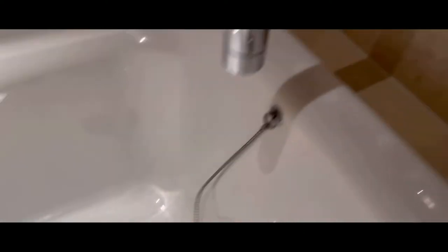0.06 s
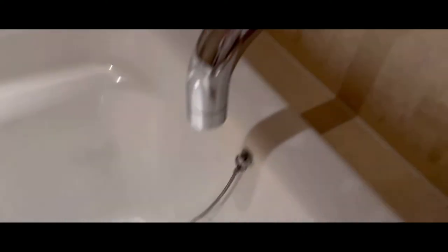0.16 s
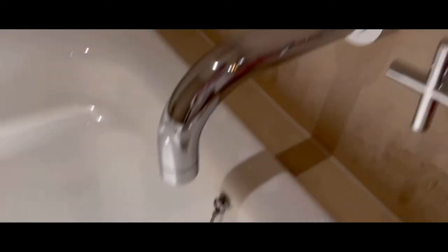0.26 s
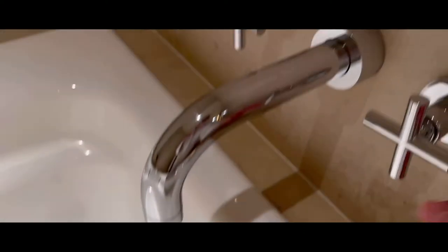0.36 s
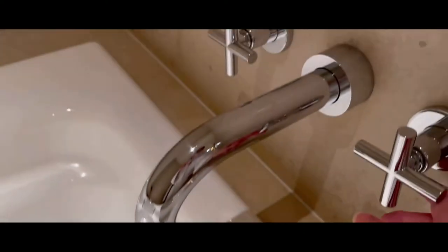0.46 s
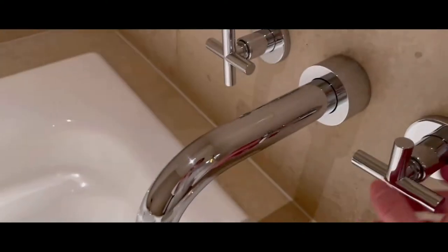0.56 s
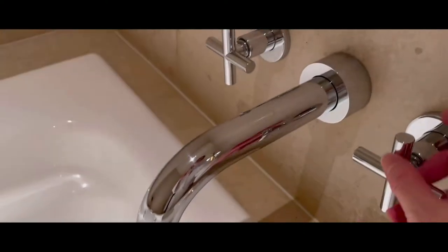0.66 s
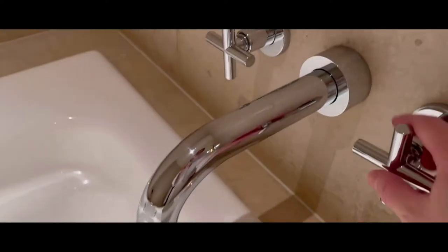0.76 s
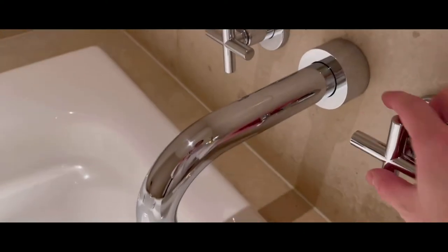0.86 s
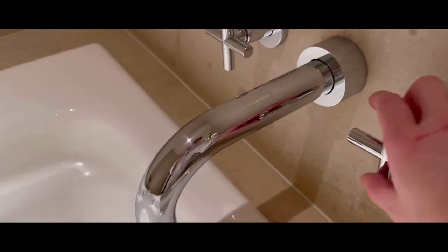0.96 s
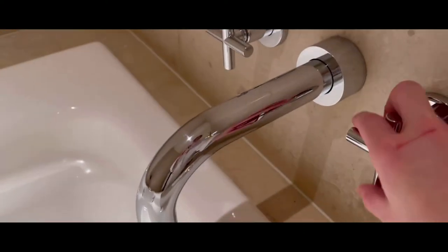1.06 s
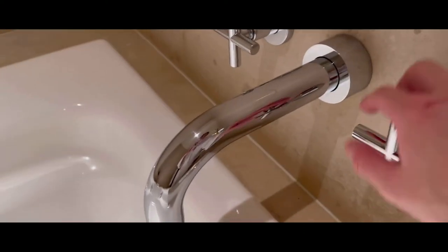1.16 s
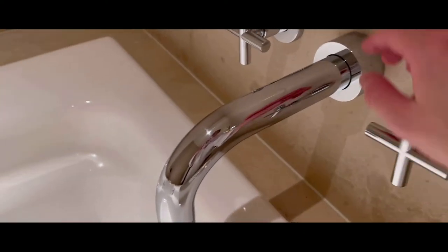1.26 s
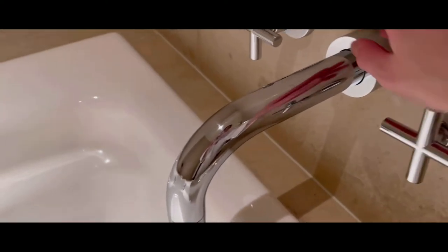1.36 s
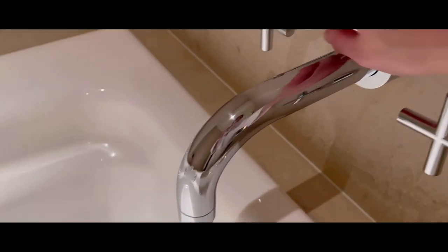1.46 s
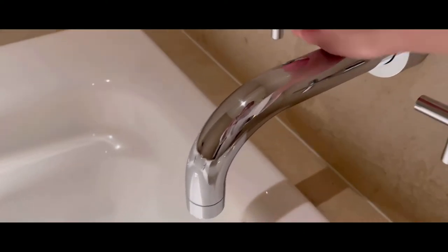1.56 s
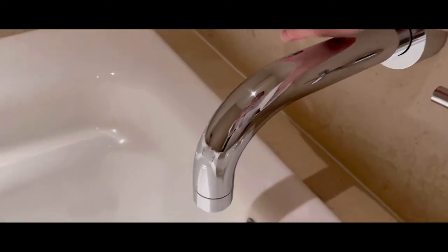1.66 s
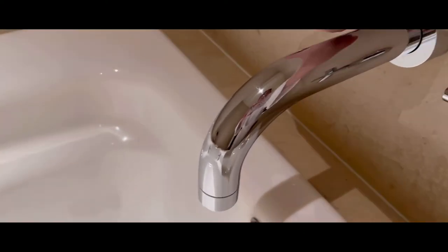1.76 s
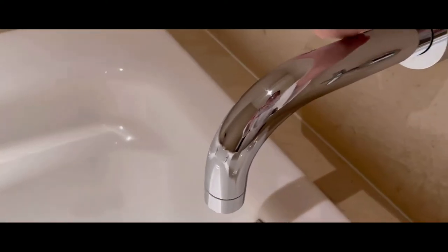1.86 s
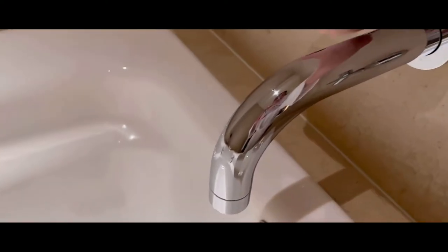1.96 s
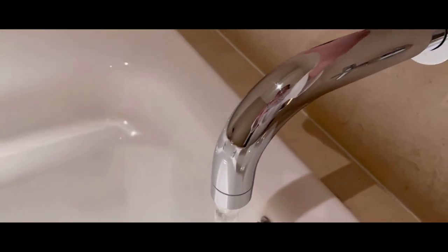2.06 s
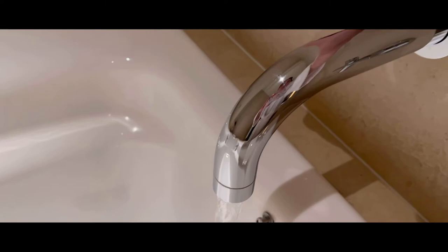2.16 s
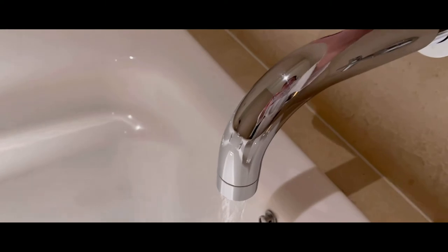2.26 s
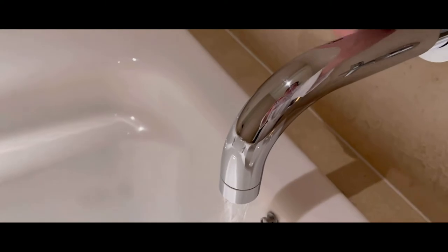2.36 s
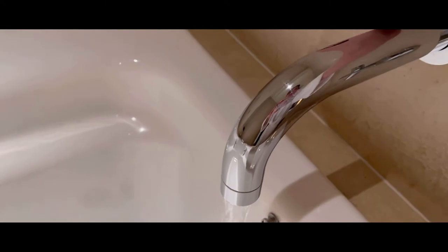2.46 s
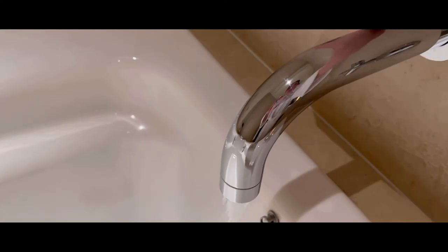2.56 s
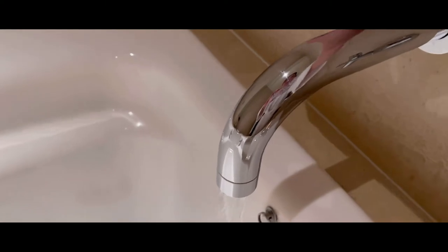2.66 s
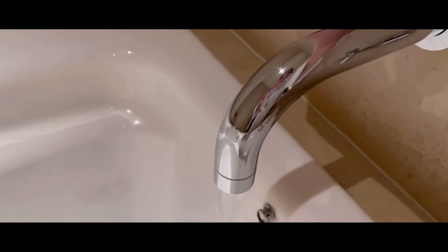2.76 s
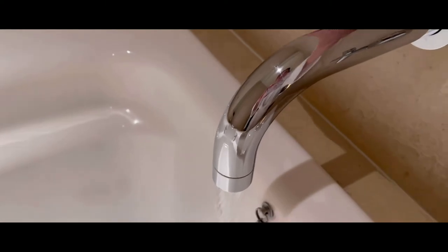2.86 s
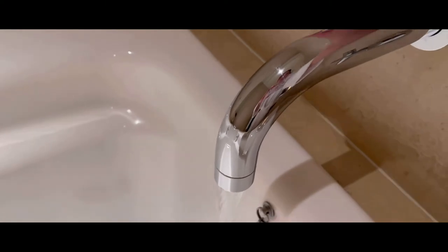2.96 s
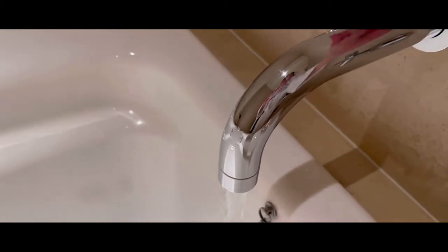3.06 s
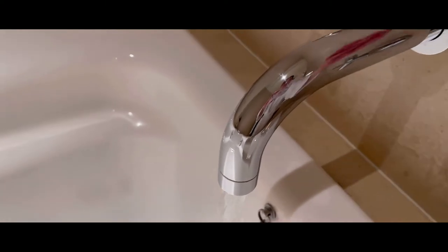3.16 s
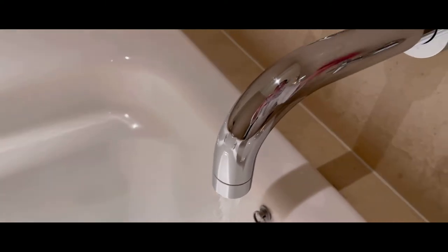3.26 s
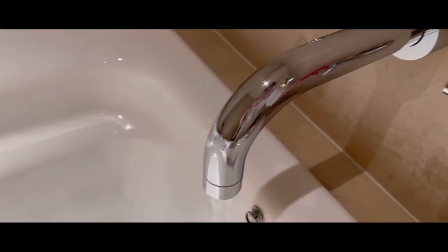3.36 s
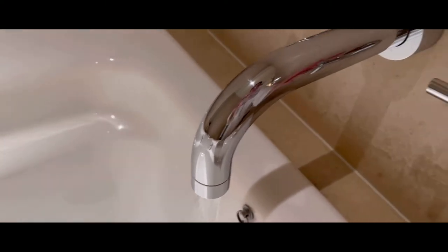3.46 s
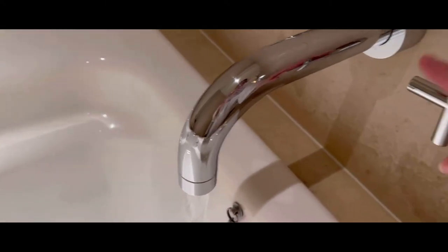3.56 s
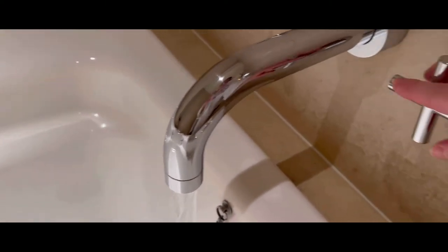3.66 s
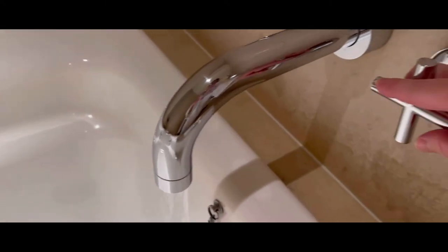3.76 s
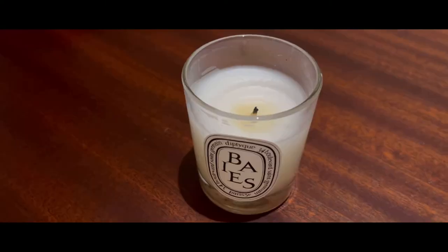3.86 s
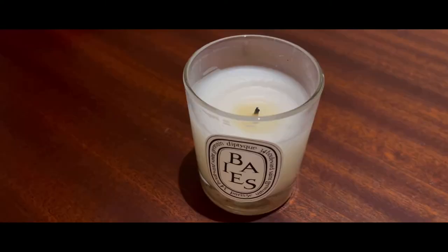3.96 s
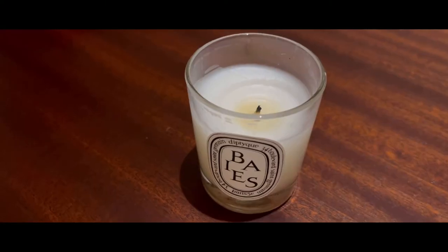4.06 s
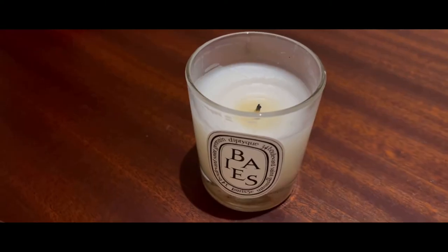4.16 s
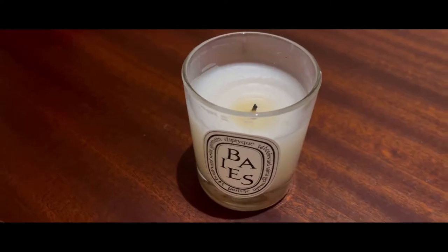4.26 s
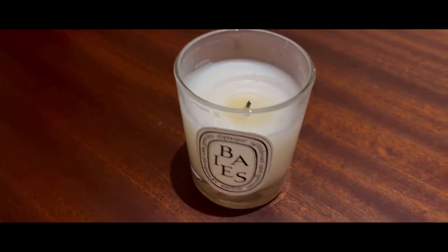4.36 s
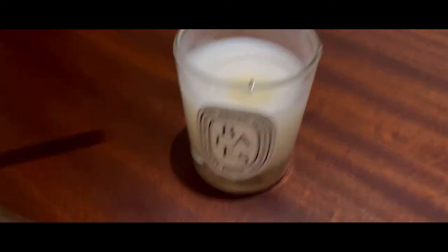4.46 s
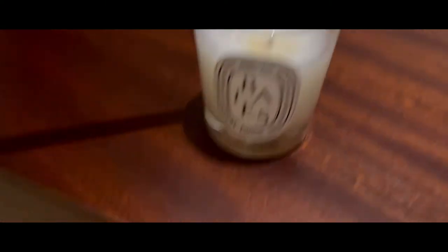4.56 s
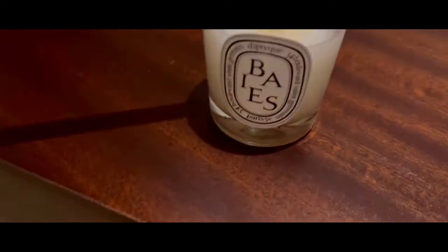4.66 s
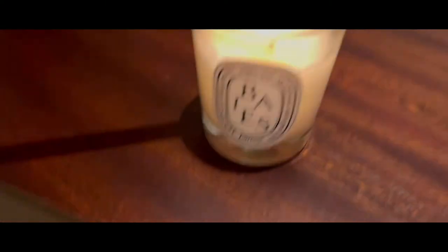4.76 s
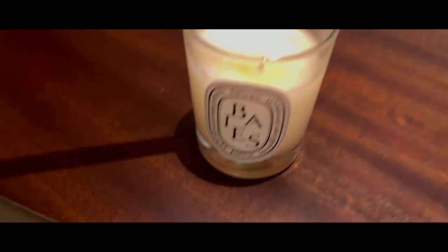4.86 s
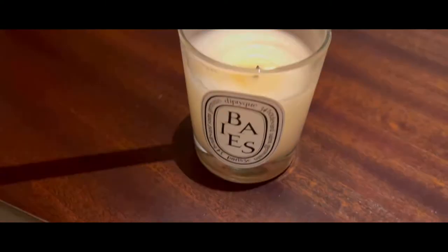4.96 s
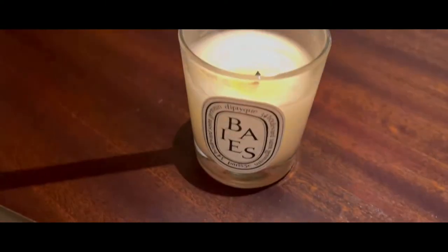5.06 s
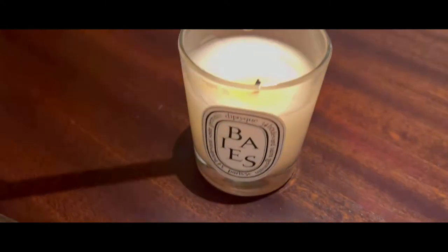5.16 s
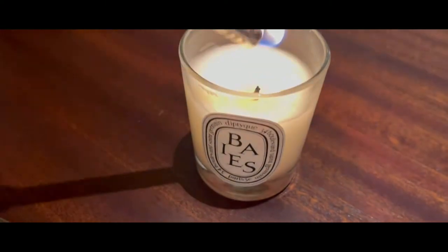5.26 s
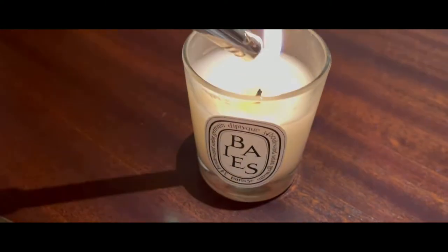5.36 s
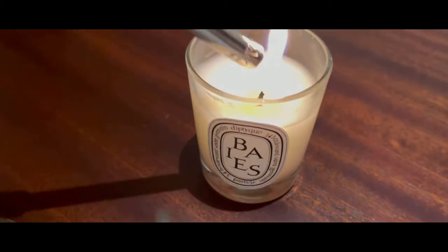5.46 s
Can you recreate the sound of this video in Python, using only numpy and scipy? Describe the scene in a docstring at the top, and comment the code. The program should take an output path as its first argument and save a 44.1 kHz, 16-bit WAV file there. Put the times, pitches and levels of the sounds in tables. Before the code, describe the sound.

A splash rings in a bathtub, a tap hisses and knocks, water drums and gurgles in, then cuts to a sharp click and wooden bump.

```python
"""A tiled bathroom: a tap is opened over an empty tub. A few splashes (shaped drop noise over tub modes),
valve hiss (coloured noise), pipe knocks (low noise and sines), then the stream: drumming resonances that
settle into a bright, gurgling splatter of ringing bubbles and drops; then a cut to a quieter scene with one
sharp click as of a switch (noise bursts, ringing modes, grainy tail) and a soft bump on wood (falling sines)."""
import sys
import numpy as np
from scipy import signal
from scipy.fft import rfft, irfft, next_fast_len
from scipy.io import wavfile

SR = 44100
rng = np.random.default_rng(int(sys.argv[2]) if len(sys.argv) > 2 else 0)


def dump(signal):
    """Clip the signal to [-1, 1] and save it as 16-bit WAV at the path in sys.argv[1]."""
    limited = np.clip(np.atleast_2d(signal).T, -1, 1)
    pcm = np.round(limited * 32767).astype(np.int16)
    wavfile.write(sys.argv[1], SR, pcm)


N = 242550
T = np.arange(N) / SR

# House rumble and air spectra. Each row: frequency in Hz, level in dB.
RUMBLE_COLOUR = [(12, -37), (20, -9), (76, 1), (125, -8.5), (161, -7.5), (189, -23.5), (236, -11.5),
                 (343, -24.5), (410, -20.5), (700, -33.5), (910, -56.5), (1540, -120)]
AIR_COLOUR = [(290, -30.5), (500, -5.5), (2530, -11), (5090, -15), (6030, -10), (10100, -20.5),
              (11800, -19), (15000, -35.5)]
AIR_DB = -80.5
TUB_RUMBLE_DB, QUIET_RUMBLE_DB = -57.5, -64.5  # before and after the cut
RUMBLE_WAVER_DB, RUMBLE_WAVER_HZ = 1.0, 5.7
# Soft low rustles of handling. Each row: start in seconds, length in seconds, level in dB.
HANDLING = [(0.4, 0.5, -56), (3.986, .17, -58), (4.256, 0.27, -62)]
# Rustle spectrum. Each row: frequency in Hz, level in dB.
HANDLING_COLOUR = [(110, 2.5), (170, 4.5), (350, -9.5), (700, -24.5)]

# Soft bumps on wood. Each row: start in seconds, thud level in dB, thud t60 in seconds, tap level in dB.
BUMPS = [(4.476, -70, .02, -54), (4.504, -52, 0.03, -47), (4.565, -23, 0.05, -45), (4.575, -37, 0.022, -52)]

# Clicks of the switch: lever press, contacts, an echo and later faint ticks.
# Each row: start in seconds, level in dB, t60 in seconds.
CLICKS = [(3.957, -50, 0.021), (3.976, -42, 0.037), (3.9869, -5, 0.0074), (3.9885, -9.5, 0.0082),
          (3.9921, -20.5, 0.011), (4.018, -26, 0.02), (4.183, -50, .025), (4.449, -56, 0.035)]
# Click and room tail spectra. Each row: frequency in Hz, level in dB.
CLICK_COLOUR = [(180, -43), (300, -23), (842, -34.5), (2170, -6), (2570, -6.5), (2880, -4.5), (5520, -9.5),
                (6100, -16), (6620, -15), (11100, -2.5), (16000, -32.5)]
TAIL_COLOUR = [(410, -64), (700, -32), (1700, -15.5), (3070, -6), (5800, -5), (7100, -9.5), (8920, -9),
               (10100, -8.5), (11000, 0), (12500, -23.5), (14000, -91)]
# Modes of the pressed lever, re LEVER_DB, and of the switch plate.
# Each row: frequency in Hz, level in dB, t60 in seconds.
LEVER_MODES = [(1860, -11.5, 0.032), (2570, 9, 0.044), (2920, -7, .03), (3424, 7.5, 0.049),
               (4065, -12.5, .025), (4650, -7.5, 0.03), (7660, -13, .025), (10540, -10, .012)]
PLATE_MODES = [(3020, -43.5, 0.4), (3190, -45.5, 0.68), (3130, -42.5, 0.67), (4590, -48.5, .42),
               (5400, -48.5, .4), (6350, -48.5, 0.53), (6550, -48.5, 0.69), (7760, -48, 0.6),
               (9800, -39, .3)]
LEVER_S, LEVER_DB, SNAP_RISE_S, TAIL_DB = 3.957, -52, 0.0005, -32.5

# Fingers shifting on the handle. Each row: start in seconds, level in dB, t60 in seconds.
GRIPS = [(1.018, -60, 0.15), (1.074, -63, 0.27), (1.184, -63, .05)]
# Handle resonances. Each row: frequency in Hz, width in Hz, level in dB.
HANDLE_MODES = [(470, 98, -9), (935, 110, -5), (1290, 83, -4), (2300, 720, 6)]

# Dull knocks of pipe and tub. Each row: start in seconds, level in dB, t60 in seconds, top edge in Hz.
KNOCKS = [(1.08, -53, 0.17, 1500), (1.477, -44.5, 1, 730), (1.58, -46, 1, 292), (1.908, -34.5, .5, 1390),
          (2.221, -38.5, 0.35, 503)]
# Knock spectrum. Each row: frequency in Hz, level in dB.
KNOCK_COLOUR = [(24, -37), (40, 1.5), (141, -6.5), (251, -16), (383, -6), (460, -14), (586, -13),
                (843, -25.5), (1040, -22), (1180, -11), (1500, -41), (1950, -63), (3300, -120)]
# Shell modes that boom under heavy slugs of water.
# Each row: start in seconds, frequency in Hz, level in dB, t60 in seconds.
BOOM = [(1.478, 245, -48, 1), (1.48, 405, -49, .7), (1.906, 369, -35, 0.21), (1.915, 137.8, -27.5, 0.43),
        (1.96, 171.4, -32, .22), (2.003, 106.2, -18, 0.45), (2.224, 255.9, -37, .17), (3.045, 406, -35, .3)]

# Lone splashes in the tub.
# Each row: start in seconds, level in dB, rise in seconds, t60 in seconds, wall ring level in dB.
SPLASHES = [(0.0, -36.5, 0.0001, 0.36, -48), (0.161, -45, .001, 0.033, -80),
            (0.173, -39.5, 0.0009, 0.43, -85), (0.28, -55.5, 0.0022, 0.53, -63),
            (0.4516, -27, 0.0093, 0.41, -40)]
# Spectra of the splash and of the tub hollow humming on. Each row: frequency in Hz, level in dB.
SPLASH_COLOUR = [(350, -47), (600, -16.5), (900, -9.5), (1530, -8), (2270, -7), (4580, -8.5), (8620, -9),
                 (10200, -7.5), (11300, -1.5), (16000, -60)]
HOLLOW_COLOUR = [(105, 6), (150, 2), (260, -14), (420, -3), (600, -7), (790, -1), (1000, -11.5),
                 (1900, -6.5), (3000, -14)]
# Tub wall modes, re the wall ring. Each row: frequency in Hz, level in dB, t60 in seconds.
WALL_MODES = [(105.4, -4, 0.94), (239, -10, 0.96), (327.4, 3, 0.54), (370, -26, 0.96), (426.5, -2, 0.66),
              (468, -7, 0.62), (571, -14, 0.66), (696, -10.5, 0.62), (760, -3, 0.64), (878, -11.5, 0.61),
              (950, -7, 0.56), (1400, -7, 0.64)]
HOLLOW_DB, HOLLOW_T60_S = -19, 0.9  # level re the splash

# Valve hiss at each turn of the handle.
# Each row: start in seconds, end in seconds, level in dB, rise in seconds.
TURNS = [(0.283, 0.43, -53.5, 0.075), (0.73, 1.052, -64, 0.057), (1.222, 1.741, -63, 0.05),
         (1.889, 2.225, -58.5, 0.013)]
# Valve hiss spectrum. Each row: frequency in Hz, level in dB.
VALVE_COLOUR = [(240, -27.5), (400, -9.5), (655, 3.5), (906, 2), (1010, 3.5), (8630, 2), (10200, -1),
                (11200, 8), (11800, -7.5), (12300, -28.5), (16000, -35.5)]
VALVE_RELEASE_S, SEEP_DB = 0.059, -72  # the hiss dies after a turn, down to a steady seep
FLUTTER_DB, FLUTTER_HZ = 2.25, 4.8  # unsteady flow through the valve

# Hollow resonances of the spout. Each row: frequency in Hz, width in Hz, level in dB.
SPOUT_MODES = [(1796, 110, -1), (2028, 87, -2), (2525, 250, 2), (3470, 140, -3), (4166, 50, -6),
               (4640, 53, -20.5), (6280, 30, -7), (6560, 150, -13)]
SPOUT_IN_HISS_DB = -12.5  # re the hiss
SPOUT_START_DB, SPOUT_END_DB = -63.5, -43.5  # under the stream, first and last
# Hiss and thin whistles of the spout. Each row: frequency in Hz, width in Hz, level in dB.
WHISTLE_MODES = [(11110, 28, 1), (11600, 50, -11), (4255, 62, -20), (2610, 180, -17), (9500, 710, -6.5),
                 (11150, 600, 1.5)]
WHISTLE_DB, WHISTLE_GROWTH_DB_PER_S = -34.5, 13  # grows until the flare, then holds
FLARE_S, FLARE_LENGTH_S, FLARE_DB = 3.14, 0.12, 2.5
# Thin notes of the spout. Each row: start in seconds, length in seconds, frequency in Hz, level in dB.
NOTES = [(3.148, 0.12, 10640, -27), (3.183, 0.21, 11140, -27), (3.39, 0.19, 11120, -38),
         (3.62, 0.22, 4850, -44.5), (3.701, 0.12, 4850, -40)]
NOTE_WAVER_HZ, NOTE_FLUTTER_DB = 34, 3

OPEN_S, SPRAY_S, CUT_S, CUT_FADE_S = 1.905, 2.225, 3.821, 0.002  # stream lands, sprays, is cut off
# Tub shell under the stream. Each row: frequency in Hz, width in Hz, level in dB.
TUB_MODES = [(68.6, 20, -7.5), (100.9, 9.8, 0), (148.3, 25, -4), (206.8, 4.5, -6), (246, 16, -6),
             (313.5, 22.5, -8.5), (371.9, 6.5, -6.5), (410, 11, -6), (444, 130, -15)]
# Bare shell drums harder until a water film cushions it; the drumming then fades slightly.
DRUM_DB, BARE_SHELL_DB, CUSHION_S, DRUM_FADE_DB_PER_S = -42, 6.5, 0.28, 0.5
# Froth and spray grow with the puddle, from dry to full level.
PUDDLE_S = 0.86
FROTH_DRY_DB, FROTH_FULL_DB = -63, -54.5
SPRAY_DRY_DB, SPRAY_FULL_DB = -46.5, -36.5
WANDER_DB, WANDER_HZ = 1.5, 12  # the jet wanders, trading drumming for froth
# Surges of the jet. Each row: start in seconds, length in seconds, froth change in dB, spray change in dB.
SURGES = [(2.083, 0.23, 5.5, 10), (2.589, 0.13, 5, -0.5), (2.825, 0.097, 3, 6), (2.951, 0.089, 1.5, 4),
          (3.178, 0.26, 3, 1.5), (3.77, 0.057, 1.5, 0)]
# Froth and spray spectra. Each row: frequency in Hz, level in dB.
BUBBLE_COLOUR = [(260, -33), (450, 5.5), (501, 0), (539, -4.5), (701, -1.5), (912, 0.5), (1090, -2),
                 (1320, 2), (2100, -4.5), (2500, -7), (3200, -14.5), (4160, -25), (7040, -120)]
SPRAY_COLOUR = [(1060, -34.5), (1800, -10), (2300, -13), (4210, -6.5), (5100, -10.5), (6240, -5.5),
                (9000, -6), (10000, -5), (10800, -2.5), (11400, -3), (13800, -24), (15100, -29.5),
                (16000, -24.5)]
# Big drops slapping the tub. Each row: start in seconds, level in dB, t60 in seconds.
SLAPS = [(0.852, -59, 0.48), (1.70, -62.5, 0.063), (1.769, -60, 0.026), (2.213, -42.5, 0.031),
         (2.227, -39.5, 0.046), (2.258, -38, 0.062), (2.285, -28.5, 0.025), (2.362, -34, 0.078),
         (2.576, -26.5, .015), (2.677, -17.5, 0.013), (2.689, -28, 0.065), (2.749, -29.5, 0.03),
         (2.787, -24, 0.026), (2.835, -24, 0.025), (2.875, -24.5, 0.071), (2.952, -27, 0.016),
         (3.039, -24, 0.024), (3.227, -30, .03), (3.236, -27, 0.044), (3.271, -24.5, 0.049),
         (3.441, -29, .02), (3.492, -25, 0.028), (3.672, -25.5, 0.024), (3.779, -25, 0.024)]
# Air pockets. Each row: start in seconds, length in seconds, start pitch in Hz, end pitch in Hz,
# level in dB, share that breaks into small bubbles (0-1).
GURGLES = [(2.109, 0.15, 1750, 1985, -46, 0.8), (2.115, .1, 1160, 1350, -47, 0.7),
           (2.424, .052, 771, 1163, -36.5, 0.4), (2.578, 0.062, 1127, 1340, -43.5, .95),
           (2.601, 0.033, 1040, 1015, -38.5, .3), (2.745, 0.067, 1830, 1800, -47, .4),
           (2.781, 0.039, 798, 980, -34, 0.6), (2.815, 0.067, 882, 860, -38, 0.92),
           (2.81, 0.013, 1680, 1830, -33.5, 0), (2.825, 0.083, 1950, 1750, -46, 0.96),
           (2.894, 0.035, 1445, 1460, -45, 0.1), (2.937, 0.012, 2130, 2350, -33, 0.84),
           (3.016, 0.011, 2270, 2307, -33.5, 0.1), (3.093, 0.075, 1270, 1464, -39, 0.9),
           (3.151, 0.053, 1597, 1366, -36.5, .7), (3.18, .026, 1330, 1000, -35.5, 0.9),
           (3.183, 0.026, 705, 740, -33, .35), (3.223, 0.13, 1590, 1655, -42.5, 0.4),
           (3.314, 0.12, 1333, 1350, -43.5, 0.92), (3.433, 0.2, 906, 942, -46, .3),
           (3.441, 0.11, 1790, 1820, -41.5, 0.86), (3.47, 0.056, 1507, 1560, -38.5, 0.84),
           (3.555, 0.045, 1293, 1420, -39, 0.5), (3.582, 0.073, 1775, 1826, -37.5, 0.3),
           (3.66, .12, 1470, 1660, -40.5, 0.98), (3.702, .016, 3340, 3300, -32.5, 0.2),
           (3.731, 0.074, 2580, 2680, -39, .95), (3.769, 0.034, 898, 1125, -33, 0.86),
           (3.816, 0.01, 1825, 1890, -41, 0.5)]
GURGLE_WOBBLE = 0.019  # pitch wobble, as a share
SHED_PER_S, SHED_SPREAD_OCTAVES, SHED_CYCLES = 220, 0.11, 11  # small bubbles shed by a pocket

# Microphone pair. Each row: frequency in Hz, left-right likeness, left minus right in dB at full lean,
# presence in dB.
PAIR = [(39.7, .8, -1, -1), (101.1, 1, 0.5, 0.5), (218.6, 0.65, -2, -0.5), (409.4, .6, 1, -2),
        (1500, 0.2, 4, -2), (4107, 0.57, 2.5, -2), (6080, 0.48, 8.5, -2), (7810, 0.47, 1.5, -0.5),
        (8530, 1, 0.5, 2.5), (10660, 1, 0, 5.5), (11220, 0.87, -0.5, -0.5), (12400, 0.91, 0.5, -0.5),
        (13670, 0.45, -0.5, -6)]
TWIST_HZ, TWIST_WIDTH_HZ = 10225, 1780
BATHROOM_T60_S, CUTOFF_HZ = 0.62, 15900


def from_db(db):
    """Decibels to gain."""
    return 10 ** (np.asarray(db) / 20)


def rms_one(x):
    """Scale to unit power."""
    return x / np.sqrt(np.mean(x ** 2) + 1e-20)


def after(start_s, rise_s):
    """Smooth step from 0 to 1 that begins at start_s."""
    return 1 - np.exp(-np.maximum(T - start_s, 0) / rise_s)


def blow(start_s, rise_s, t60_s):
    """Envelope that rises at start_s and dies away."""
    return after(start_s, rise_s) * from_db(-60 * np.clip((T - start_s) / t60_s, 0, 4))


def swell(start_s, length_s):
    """Arch from 0 to 1 and back, quicker up than down."""
    return np.sin(np.pi * np.sqrt(np.clip((T - start_s) / length_s, 0, 1)))


def noise():
    """White noise as a (mid, side) pair."""
    return rng.standard_normal((2, N))


def drift(rate_hz):
    """Slow random signal of spread 1: two-pole smoothed noise at SR / 40, interpolated."""
    r = np.exp(-80 * np.pi * rate_hz / SR)
    white = rng.standard_normal(N // 40 + 2002)
    slow = signal.lfilter([1], [1, -2 * r, r * r], white)[2000:]
    return np.interp(np.arange(N) / 40, np.arange(len(slow)), rms_one(slow))


def lowpass(x, order, edge_hz):
    """Butterworth low-pass."""
    return signal.sosfilt(signal.butter(order, edge_hz, fs=SR, output="sos"), x)


def colour(x, spectrum, size=8192):
    """Minimum-phase filter of unit power gain that follows a spectrum and falls steeply beyond its ends."""
    hz, db = np.transpose(spectrum)
    octave = np.log2(np.maximum(np.fft.rfftfreq(size, 1 / SR), 1))
    knots = np.log2(hz)
    outside = np.abs(octave - np.clip(octave, knots[0], knots[-1]))
    gain_db = np.interp(octave, knots, db) - 24 * np.minimum(outside, 2)
    cepstrum = irfft(np.log(from_db(gain_db)))[:size // 2]
    cepstrum[0] = 0
    response = irfft(np.exp(rfft(2 * cepstrum, size)))
    response /= np.linalg.norm(response)
    return signal.fftconvolve(x, response[None], axes=1)[:, :N]


def resonate(x, hz, width_hz):
    """One two-pole resonance, output at unit power."""
    r = np.exp(-np.pi * width_hz / SR)
    poles = [1, -2 * r * np.cos(2 * np.pi * hz / SR), r * r]
    return rms_one(signal.lfilter([1, 0, -1], poles, x + 1e-18))


def body(x, modes):
    """Resonances driven together with alternating sign, at unit power."""
    return rms_one(sum(from_db(db) * resonate(x, hz, width_hz) * (-1) ** k
                       for k, (hz, width_hz, db) in enumerate(modes)))


def struck(start_s, level_db, modes, waver, rise_s):
    """Modes rung by one blow, each from its own direction, wavering at random in level and phase."""
    age = np.maximum(T - start_s, 0)
    out = np.zeros((2, N))
    for (hz, mode_db, t60_s), bearing in zip(modes, rng.normal(0, 1.0, len(modes))):
        level = from_db(level_db + mode_db) * blow(start_s, rise_s, t60_s) * (1 + waver * drift(24))
        out += np.outer([1, bearing], level * np.sin(2 * np.pi * hz * age + waver * drift(25)))
    return out


def drops(per_s, spread_db):
    """Random impacts of uneven size, each from its own direction, at unit power."""
    at = rng.integers(0, N, 40000)[:int(per_s * N / SR)]
    size, bearing = rng.random((40000, 2))[:len(at)].T
    gain = from_db(spread_db * np.minimum(-np.log(1 - size), 5))
    out = np.zeros((2, N))
    out[:, at] = gain * [np.cos(2 * np.pi * bearing), np.sin(2 * np.pi * bearing)]
    return rms_one(out)


def room(x, t60_s, treble_t60_s, wet_db):
    """Add a diffuse noise tail whose treble dies sooner."""
    t, white = T[:SR], rng.standard_normal((2, SR))
    low = lowpass(white, 2, 5000)
    high = signal.sosfilt(signal.butter(2, 5000, "high", fs=SR, output="sos"), white)
    tail = low * from_db(-60 * t / t60_s) - high * from_db(-60 * t / treble_t60_s)
    tail *= t > 0.005
    tail /= np.linalg.norm(tail, axis=1, keepdims=True)
    return x + from_db(wet_db) * signal.fftconvolve(x, tail, axes=1)[:, :N]


def tub_echoes(x, strength, count=7):
    """Hard tub sides return the sound within 1-9 ms and ripple its spectrum."""
    lags = (rng.uniform(0.001, 0.009, count) * SR).astype(int)
    echoes = sum(np.pad(x, ((0, 0), (lag, 0)))[:, :N] * (-1) ** k for k, lag in enumerate(lags))
    return (x + strength * echoes) / np.sqrt(1 + count * strength ** 2)


def background():
    """Slowly wavering house rumble, handling rustles and faint air, all coloured noise."""
    rumble_db = np.where(T < CUT_S, TUB_RUMBLE_DB, QUIET_RUMBLE_DB)
    rumble_db = rumble_db + RUMBLE_WAVER_DB * drift(RUMBLE_WAVER_HZ)
    rumble = from_db(rumble_db) * colour(noise(), RUMBLE_COLOUR)
    rustle = sum(from_db(db) * swell(s, length_s) for s, length_s, db in HANDLING)
    air = from_db(AIR_DB) * colour(noise(), AIR_COLOUR)
    return rumble + rustle * colour(noise(), HANDLING_COLOUR) + air


def bump(top_hz, low_hz, glide_s):
    """Light tap, then bending waves in a board: the high ones arrive first, so each thud falls in pitch."""
    out = np.zeros((2, N))
    for s, thud_db, t60_s, tap_db in BUMPS:
        hz = low_hz + top_hz / (1 + np.maximum(T - s, 0) / glide_s)
        phase = 2 * np.pi * np.cumsum((T > s) * hz) / SR
        thud = blow(s, 0.0041, t60_s) * np.sin(phase) * [[1], [0.3]]
        tap = lowpass(blow(s, 0.00023, t60_s=0.058) * noise(), 2, 1000)
        out += from_db(thud_db) * thud + from_db(tap_db) * tap
    tail = room(out, t60_s=0.36, treble_t60_s=0.2, wet_db=-10) - out
    return out + lowpass(tail, 1, 450)


def switch():
    """Lever is pressed, a spring snaps over, contacts bounce; the room answers with grainy reflections."""
    bursts = sum(from_db(db) * blow(s, SNAP_RISE_S, t60_s) for s, db, t60_s in CLICKS)
    clicks = colour(bursts * np.sign(noise()), CLICK_COLOUR)
    snap_s = max(CLICKS, key=lambda row: row[1])[0]  # loudest click
    diffuse = colour(drops(per_s=2400, spread_db=0.8), TAIL_COLOUR)
    dull = lowpass(diffuse, 1, 4500)
    tail = dull * blow(snap_s, 0.0038, t60_s=0.63) + (diffuse - dull) * blow(snap_s, 0.0036, t60_s=0.4)
    lever = struck(LEVER_S, LEVER_DB, LEVER_MODES, waver=0.18, rise_s=0.0012)
    plate = struck(snap_s, 0, PLATE_MODES, waver=0.3, rise_s=0.0096)
    return lever + plate + clicks + from_db(TAIL_DB + 1.0 * drift(45)) * tail


def handle():
    """Cross handle clacks lightly as fingers shift on it: noise bursts through its resonances."""
    grips = sum(from_db(db) * blow(s, 0.0023, t60_s) for s, db, t60_s in GRIPS)
    return grips * body(noise(), HANDLE_MODES)


def knocks():
    """Surges thud in the pipe and on the shell, whose low modes boom on."""
    thud, out = colour(noise(), KNOCK_COLOUR), np.zeros((2, N))
    for s, db, t60_s, edge_hz in KNOCKS:
        out += lowpass(from_db(db) * blow(s, 0.0035, t60_s) * thud, 4, edge_hz)
    for s, hz, db, t60_s in BOOM:
        out[0] += from_db(db) * blow(s, 0.016, t60_s) * np.sin(2 * np.pi * hz * (T - s))
    return out


def splashes():
    """Slugs of water shatter into drops and set the wall and the hollow of the tub ringing."""
    burst = sum(from_db(db) * blow(s, rise_s, t60_s) for s, db, rise_s, t60_s, _ in SPLASHES)
    shatter = colour(burst * drops(per_s=9000, spread_db=1.0), SPLASH_COLOUR)
    ringing = sum(struck(s, ring_db, WALL_MODES, waver=0.42, rise_s=0.028)
                  for s, _, _, _, ring_db in SPLASHES)
    hum = sum(from_db(db + HOLLOW_DB) * blow(s, 0.032, HOLLOW_T60_S) for s, db, *_ in SPLASHES)
    return tub_echoes(shatter, strength=0.17) + ringing + hum * colour(noise(), HOLLOW_COLOUR)


def valve():
    """Water squeezes unsteadily through the barely open seat and sounds the spout resonances."""
    turning = sum(from_db(db) * after(start_s, rise_s) * (1 - after(end_s, VALVE_RELEASE_S))
                  for start_s, end_s, db, rise_s in TURNS)
    flow = (turning + from_db(SEEP_DB)) * from_db(FLUTTER_DB * drift(FLUTTER_HZ))
    hiss = colour(noise(), VALVE_COLOUR)
    return flow * (hiss + from_db(SPOUT_IN_HISS_DB) * body(noise(), SPOUT_MODES))


def whistles():
    """Spout rings under the stream; its hiss grows and flares once; thin wavering notes come and go."""
    hiss_db = WHISTLE_DB - WHISTLE_GROWTH_DB_PER_S * np.maximum(FLARE_S - T, 0)
    hiss_db += FLARE_DB * swell(FLARE_S, FLARE_LENGTH_S)
    notes = np.zeros(N)
    for s, length_s, hz, note_db in NOTES:
        phase = 2 * np.pi * np.cumsum(hz + NOTE_WAVER_HZ * drift(60)) / SR
        notes += from_db(note_db + NOTE_FLUTTER_DB * drift(40)) * swell(s, length_s) * np.sin(phase)
    spout_db = np.interp(T, [OPEN_S, CUT_S], [SPOUT_START_DB, SPOUT_END_DB])
    ringing = from_db(spout_db) * body(noise(), SPOUT_MODES)
    return from_db(hiss_db) * body(noise(), WHISTLE_MODES) + np.outer([1, 0.4], notes) + ringing


def ring_bubbles(birth_s, hz, gain, bearing, cycles, size):
    """Each bubble rings for some cycles and rises a little in pitch as it dies; unit energy in all."""
    turns = hz * np.arange(size) / SR
    life = turns / cycles
    tone = np.sin(2 * np.pi * turns * (1 + 0.024 * np.minimum(life, 5)))
    wave = gain * np.sqrt(hz) * np.exp(-life) * tone * np.linspace(1, 0, size)
    at = ((birth_s * SR).astype(int) + np.arange(size)).ravel()
    out = np.array([np.bincount(at, (wave * np.cos(bearing - turn)).ravel(), N)[:N]
                    for turn in (0, np.pi / 2)])
    return out / np.linalg.norm(out)


def bubbles(low_hz, high_hz, cycles, spread_db, count, size):
    """Bubbles of all sizes, born at random while the stream runs; unit power over that time."""
    birth, pitch, strength, bearing = rng.random((count, 4)).T[:, :, None]
    gain = from_db(spread_db * np.minimum(-np.log(1 - strength), 4))
    running_s = CUT_S - OPEN_S
    hz = low_hz * (high_hz / low_hz) ** pitch
    ringing = ring_bubbles(OPEN_S + birth * running_s, hz, gain, 2 * np.pi * bearing, cycles, size)
    return np.sqrt(2 * running_s * SR) * ringing


def gurgles(count=64):
    """Trapped air pockets ring and glide as they change size, shedding small bubbles of nearly their pitch."""
    out, wobble = np.zeros((2, N)), 1 + GURGLE_WOBBLE * drift(120)
    bearings = rng.uniform(-0.71, 0.37, len(GURGLES))
    for (s, length_s, start_hz, end_hz, db, broken), bearing in zip(GURGLES, bearings):
        at = int(s * SR) + np.arange(int(length_s * SR))
        broken = np.clip(broken, 0, 1)
        phase = 2 * np.pi * np.cumsum(np.geomspace(start_hz, end_hz, len(at)) * wobble[at]) / SR
        whole = np.sqrt(1 - broken ** 2) * swell(s, length_s)[at] * np.sin(phase)
        out[:, at] += np.outer([1, bearing], from_db(db) * whole)

        shed = rng.uniform(-1, 1, (count, 3))[:2 + int(length_s * SHED_PER_S)]
        jitter, detune, scatter = shed.T[:, :, None]
        along = (np.arange(len(jitter))[:, None] + (1 + jitter) / 2) / (len(jitter) + 1)
        hz = start_hz * (end_hz / start_hz) ** along * 2 ** (SHED_SPREAD_OCTAVES * detune)
        small = ring_bubbles(s + along * length_s, hz, np.sin(np.pi * along), bearing + scatter,
                             SHED_CYCLES, size=2048)
        out += from_db(db) * broken * np.sqrt(len(at)) / 2 * small
    return out


def jet():
    """Gains of drumming, froth and spray as the puddle builds and the jet wanders and surges."""
    age = np.maximum(T - OPEN_S, 0)
    puddle, wander_db = np.minimum(age / PUDDLE_S, 1), WANDER_DB * drift(WANDER_HZ)
    drum_db = DRUM_DB + BARE_SHELL_DB * np.exp(-age / CUSHION_S) - DRUM_FADE_DB_PER_S * age + wander_db
    froth_db = FROTH_DRY_DB + (FROTH_FULL_DB - FROTH_DRY_DB) * puddle - wander_db / 2
    spray_db = SPRAY_DRY_DB + (SPRAY_FULL_DB - SPRAY_DRY_DB) * puddle
    for s, length_s, more_froth_db, more_spray_db in SURGES:
        surge = swell(s, length_s)
        froth_db = froth_db + more_froth_db * surge
        spray_db = spray_db + more_spray_db * surge
    return from_db(drum_db), from_db(froth_db), from_db(spray_db)


def stream():
    """Jet drums on the shell, beats bubbles into the puddle and throws spray and fizz."""
    drum_gain, froth_gain, spray_gain = jet()
    running = after(OPEN_S, rise_s=0.0034)
    shell = drum_gain * running * body(drops(per_s=900, spread_db=0.5), TUB_MODES)

    churn = bubbles(462.4, 3355, cycles=6.5, spread_db=0.7, count=2200, size=1024)
    churn += from_db(-2.5) * drops(per_s=2500, spread_db=3.5)
    churn += from_db(-10) * bubbles(500, 2400, cycles=13, spread_db=2.0, count=130, size=2048)  # ring longer
    froth = colour(froth_gain * running * churn, BUBBLE_COLOUR)

    fizz = bubbles(2204, 12000, cycles=12, spread_db=3.5, count=2500, size=512)
    splatter = drops(per_s=6700, spread_db=2.5) + from_db(-5.5) * fizz
    splatter *= from_db(0.48 * drift(32)) * spray_gain * after(SPRAY_S, rise_s=0.012)
    slaps = sum(from_db(db) * blow(s, 0.00067, t60_s) for s, db, t60_s in SLAPS) * noise()
    spray = tub_echoes(colour(splatter + slaps, SPRAY_COLOUR), strength=0.06)

    pockets = room(gurgles(), BATHROOM_T60_S, treble_t60_s=0.45, wet_db=-9)
    splashing = room(froth + spray, BATHROOM_T60_S, treble_t60_s=0.48, wet_db=-7.0)
    return shell + running * whistles() + pockets + splashing


def microphones(pair, lean):
    """Mid and side to left and right; in the top treble the two ports swing through opposite phase."""
    size = next_fast_len(N + 4096)
    hz = np.maximum(np.fft.rfftfreq(size, 1 / SR), 1)
    knots, *columns = np.transpose(PAIR)
    alike, tilt_db, presence_db = [np.interp(np.log(hz), np.log(knots), c) for c in columns]
    alike, sides = np.clip(alike, -0.998, 0.998), np.array([[1], [-1]])
    mid, side = rfft(pair, size)
    ports = np.sqrt(1 + alike) * mid + sides * np.sqrt(1 - alike) * side
    ports /= np.sqrt(1 + np.abs(alike))
    twist = np.pi * (1 + np.clip((hz - TWIST_HZ) / TWIST_WIDTH_HZ, -1, 1))
    ports[0] *= np.exp(1j * twist)
    return irfft(ports * from_db(presence_db + sides * lean * tilt_db / 2), size)[:, :N]


def scene():
    """Water, a little to the left, is cut off, tail and all; the other sounds lie nearly straight ahead."""
    water = splashes() + valve() + handle() + knocks() + stream()
    water *= 1 - after(CUT_S, CUT_FADE_S)
    quiet = background() + bump(top_hz=2370, low_hz=45.04, glide_s=0.0004) + switch()
    return microphones(water, lean=0.86) + microphones(quiet, lean=0.13)


def record(dry):
    """Cut the top steeply."""
    return signal.sosfilt(signal.ellip(10, 0.1, 80, CUTOFF_HZ, fs=SR, output="sos"), dry)


dry = scene()
out = record(dry)
dump(out)
```